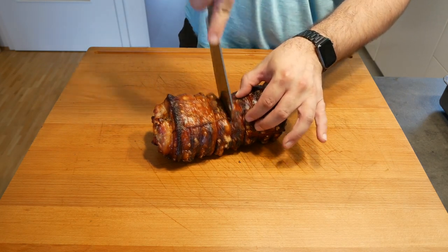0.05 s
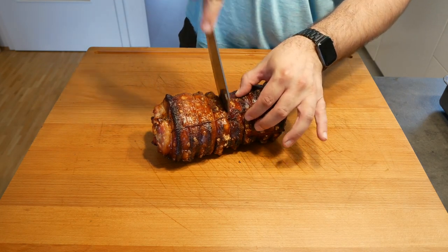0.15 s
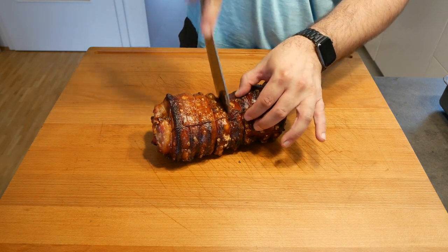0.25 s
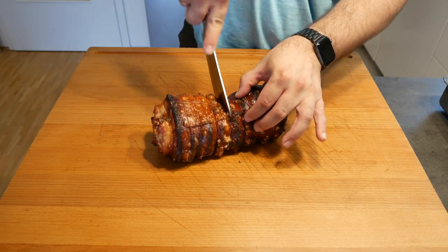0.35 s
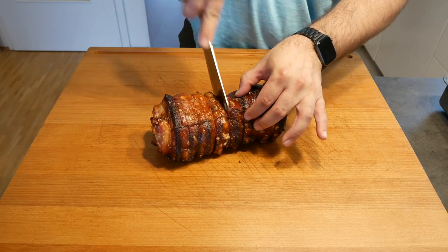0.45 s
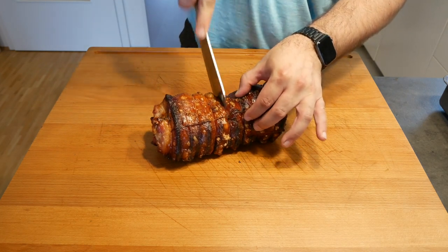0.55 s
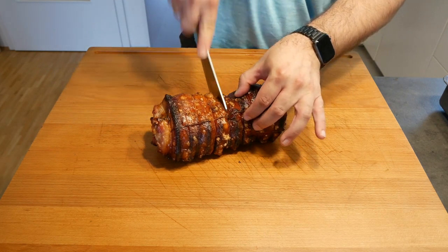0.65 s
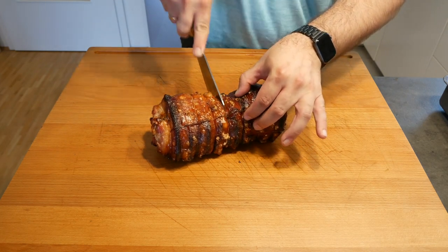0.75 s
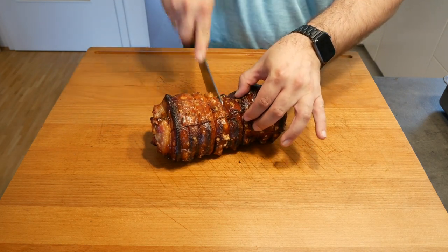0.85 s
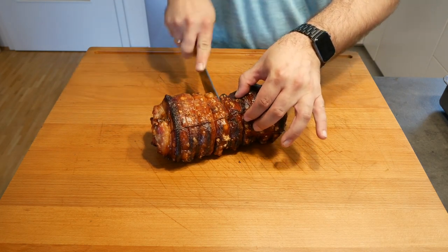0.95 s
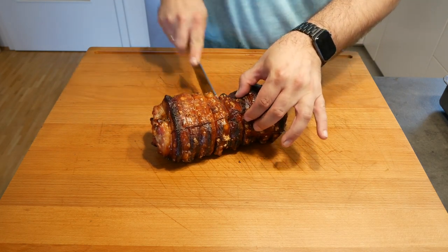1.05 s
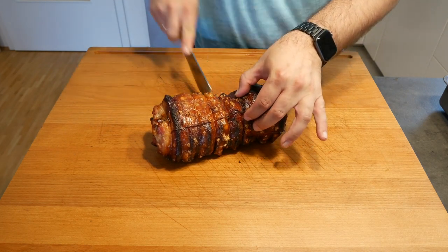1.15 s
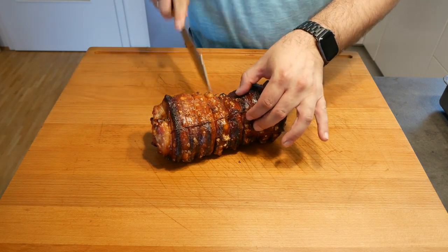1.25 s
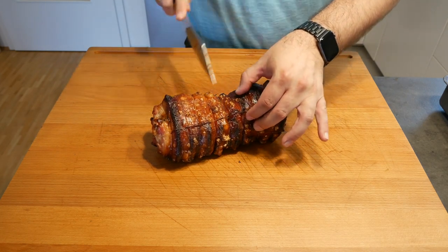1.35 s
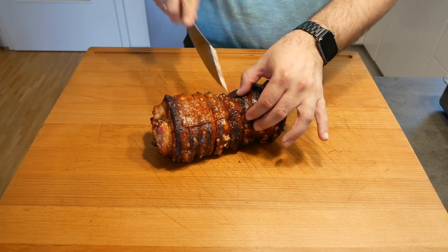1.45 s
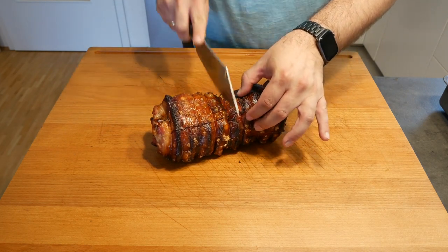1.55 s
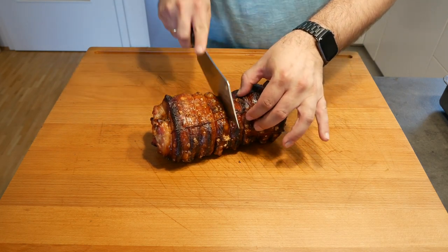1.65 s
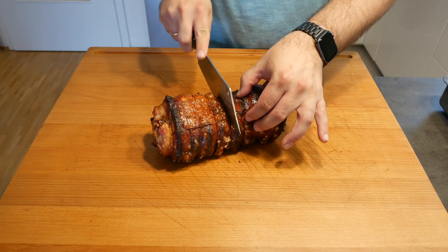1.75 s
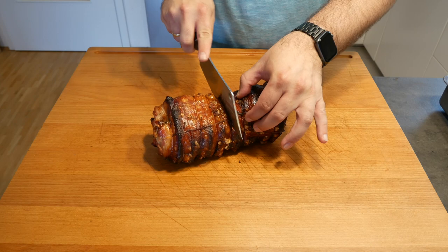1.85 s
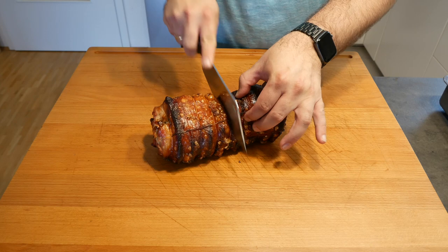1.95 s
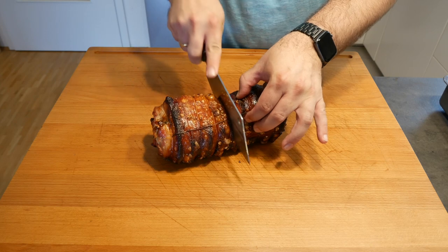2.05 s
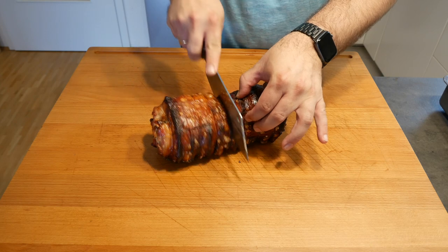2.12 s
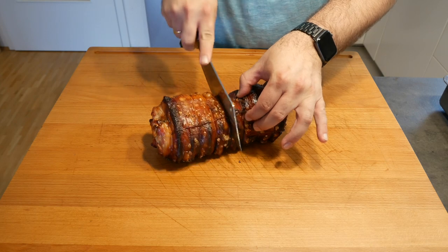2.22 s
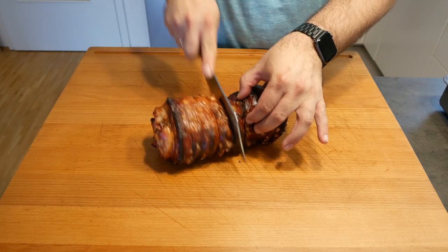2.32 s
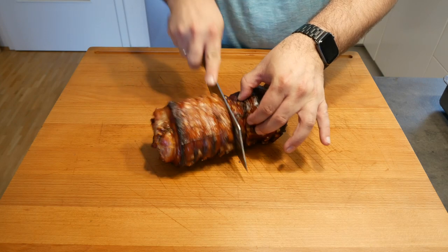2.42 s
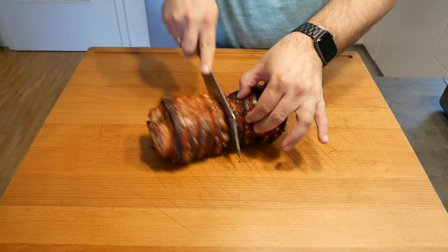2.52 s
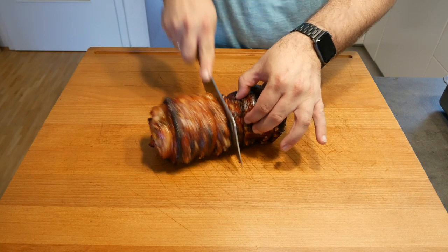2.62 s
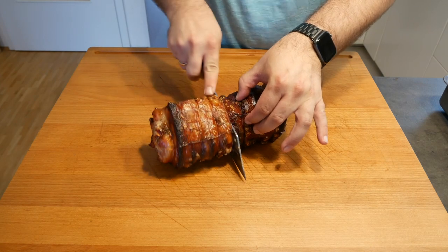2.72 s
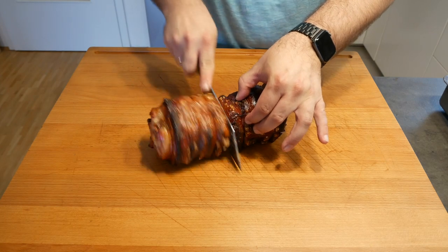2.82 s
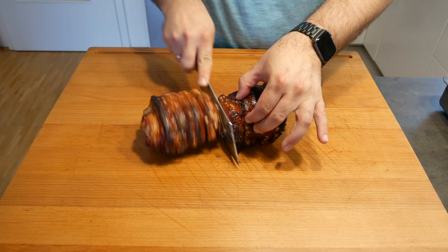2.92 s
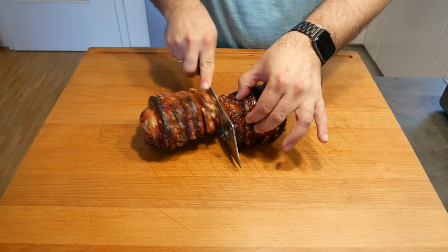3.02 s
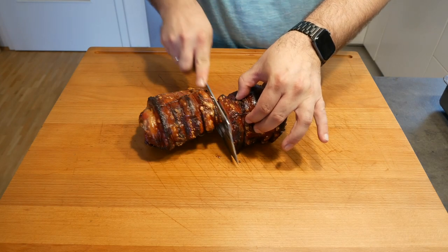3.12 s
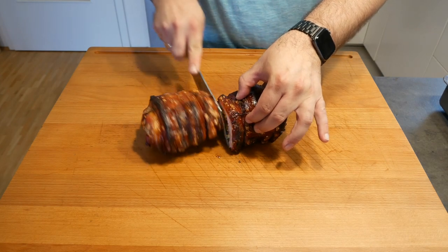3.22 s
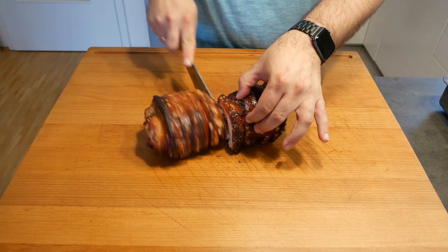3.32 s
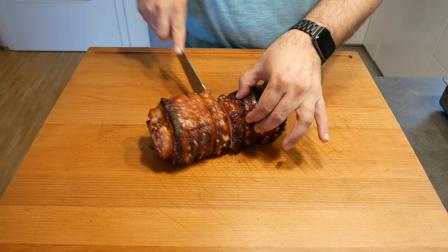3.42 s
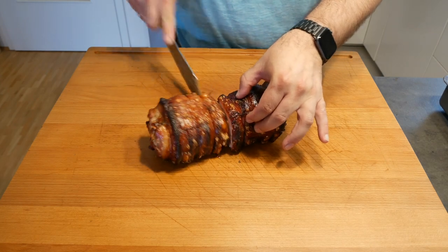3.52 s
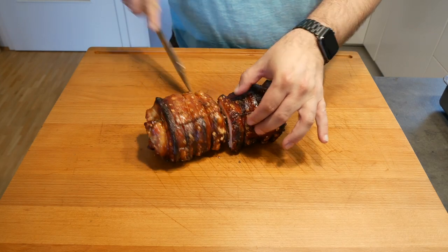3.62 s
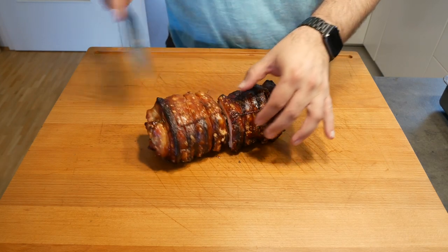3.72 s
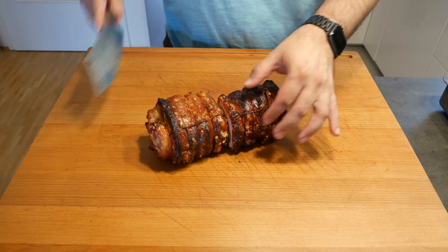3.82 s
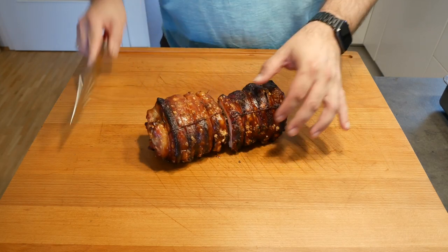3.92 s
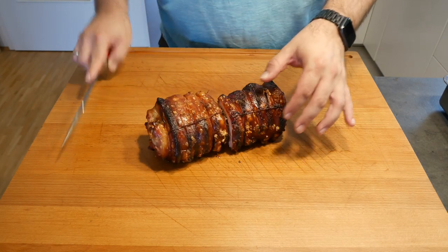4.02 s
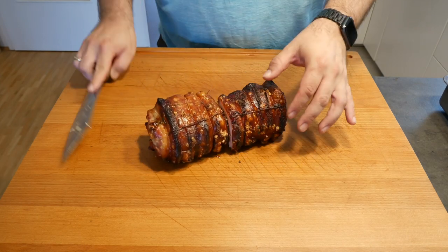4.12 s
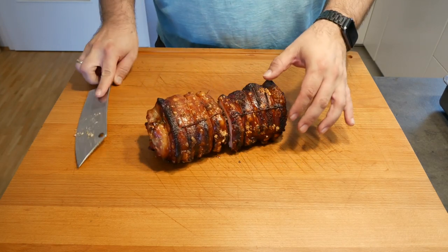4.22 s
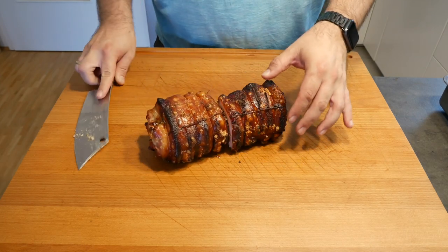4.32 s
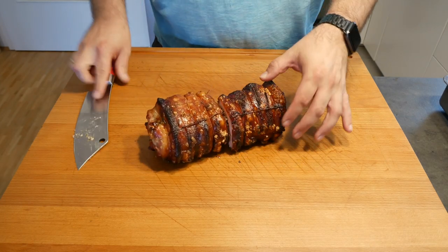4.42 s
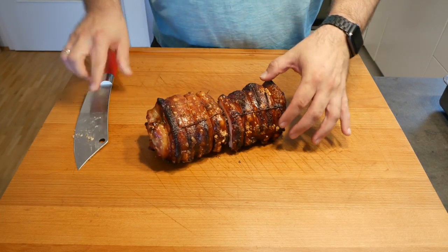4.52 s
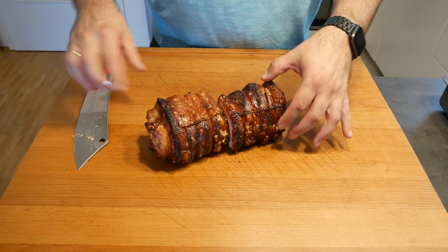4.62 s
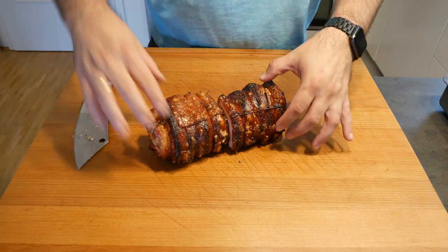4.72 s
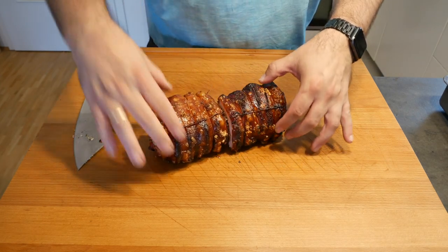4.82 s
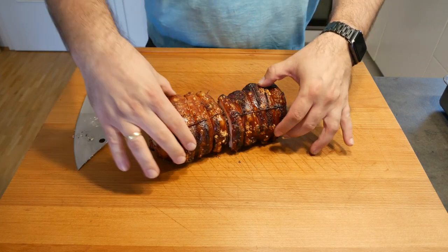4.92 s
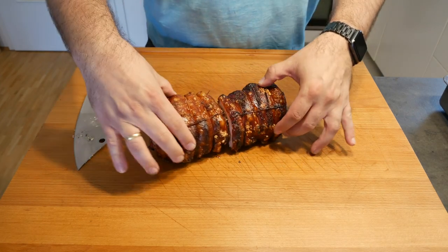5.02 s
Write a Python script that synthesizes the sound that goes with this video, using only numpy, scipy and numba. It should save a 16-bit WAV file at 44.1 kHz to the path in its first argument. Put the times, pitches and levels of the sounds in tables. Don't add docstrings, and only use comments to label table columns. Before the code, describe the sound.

A knife saws into a crackly roast on a wooden board, skin crunching and edge knocking, then the blade is laid down with a brief steely clack.

```python
import sys
import numpy as np
from scipy import signal
from scipy.fft import rfft, irfft, next_fast_len
from scipy.io import wavfile
from scipy.ndimage import uniform_filter1d
from numba import njit

SR = 44100
rng = np.random.default_rng(int(sys.argv[2]) if len(sys.argv) > 2 else 0)


def transcribe(signal):
    frames = np.atleast_2d(signal).T
    limited = np.clip(frames, -1, 1)
    pcm = np.round(limited * 32767).astype(np.int16)
    wavfile.write(sys.argv[1], SR, pcm)


def to_linear_factor(level_db):
    exponent = np.asarray(level_db, float) / 20
    return 10 ** exponent


N = 223066

# start_s, length_s, start_db, end_db, depth (-1 edge skims the crust, 1 blade deep in the meat)
STROKES = [(0, 0.17, -48.5, -63, -0.094), (.202, 0.088, -48.5, -41, -0.12), (.31, 0.17, -51, -66, -0.0013),
           (0.511, 0.053, -58, -50, -0.14), (0.629, 0.069, -45.5, -72, 1), (.76, 0.093, -67.5, -47, 0.31),
           (0.868, .14, -55, -48.5, 0.77), (1.02, 0.11, -47, -47.5, 0.13), (1.16, 0.055, -60, -78, -0.7),
           (1.58, 0.093, -66, -69, -1.4), (1.712, 0.11, -54, -61.5, 0.48), (1.82, 0.16, -54, -56.5, -0.18),
           (2.03, 0.14, -67, -52.5, -0.52), (2.36, .13, -47.5, -49, 0.38), (2.7, 0.13, -57.5, -47, 0.99),
           (2.862, 0.084, -54, -48.5, 1.0), (3.03, .185, -48.5, -48, .85), (3.225, .31, -47, -48.5, .4),
           (3.55, .09, -57, -70, -.1), (3.87, .05, -67, -70, 1), (4.04, 0.056, -68, -62, 0.43),
           (4.555, 0.16, -63, -59.5, 0.87), (4.744, 0.044, -53.5, -68, 0.94), (5.0, .06, -74, -61, 0.57)]
# start_s, length_s, start_db, end_db
DRAGS = [(0, 0.1, -53, -73), (.21, 0.084, -64, -42), (.31, 0.1, -45, -65), (1.66, 0.064, -67, -63),
         (1.82, 0.072, -51.5, -52.5), (2.38, 0.082, -50, -51), (2.7, 0.1, -30, -41),
         (2.84, 0.098, -51.5, -54), (3.04, 0.55, -50, -56), (3.54, 0.22, -63, -62), (4.74, 0.031, -60, -63)]
# pitch_hz, width_hz, level_db
BLADE_MODES = [(822, 52, -3.5), (1106, 730, 2), (1500, 53, 7.5), (1886, 290, 4), (2220, 120, -4),
               (3210, 70, -1.5), (3460, 25, -2), (4400, 78, -13), (5900, 110, -10.5)]
# time_s, pitch_factor
FREE_BLADE = [(0, 0.86), (.2, 0.71), (.3, 0.67), (.85, 1), (1.15, 1.03), (2.4, 0.79), (2.7, 1.15),
              (2.95, 0.9), (3.03, 0.97), (3.3, 1.08), (3.55, 1.08), (5.06, 0.89)]
# start_s, length_s, start_hz, end_hz, level_db
SINGING = [(3.022, .07, 820, 740, -46.5), (3.035, .055, 1100, 1160, -47), (3.26, .05, 1540, 1550, -51),
           (3.155, .025, 2060, 2050, -51), (3.03, .07, 2300, 2250, -55), (2.665, .06, 3400, 3350, -51),
           (2.75, .1, 3350, 3300, -56), (2.67, .09, 800, 800, -44), (2.67, .1, 1100, 1080, -46),
           (2.67, .08, 1550, 1500, -50), (.268, .028, 620, 600, -41), (.21, .03, 600, 600, -48),
           (.268, .02, 2400, 2500, -46), (.292, .008, 8500, 8800, -44), (.27, .015, 8000, 8000, -49),
           (.61, .008, 2500, 2600, -35), (.61, .012, 1900, 1800, -36), (.622, .012, 2200, 2300, -42),
           (.849, .012, 1150, 1150, -27), (3.1, .12, 740, 850, -52), (3.2, .14, 900, 1010, -53),
           (3.3, .09, 860, 900, -52), (3.39, .15, 940, 1110, -53), (3.2, .12, 1560, 1520, -54),
           (3.03, .17, 2020, 2050, -56), (3.05, .07, 1850, 1840, -57), (3.14, .16, 3350, 3850, -58),
           (3.2, .11, 2600, 2700, -58), (3.39, .06, 3080, 3100, -57), (3.5, .05, 3100, 3100, -56),
           (3.46, .07, 2250, 2100, -55), (3.33, .11, 4280, 4500, -60), (3.35, .06, 1500, 1540, -57),
           (1.0, .06, 3750, 3750, -57), (1.07, .05, 3550, 3550, -55), (1.09, .05, 2330, 2300, -55),
           (.96, .09, 2600, 2650, -59), (1.03, .09, 1500, 1560, -55), (1.04, .06, 4450, 4400, -59),
           (2.87, .09, 1050, 1150, -53)]
# start_s, length_s, pitch_hz, level_db
ZINGS = [(1.591, 0.091, 7660, -56), (1.585, 0.048, 8750, -63), (1.615, .04, 9100, -72),
         (2.575, 0.0088, 8050, -42), (2.599, 0.017, 8160, -33.5), (.601, 0.01, 2560, -38),
         (.602, 0.014, 1764, -39.5), (.615, 0.017, 2380, -48), (.616, 0.01, 3400, -44),
         (.858, 0.028, 1500, -45.5), (2.095, 0.085, 7090, -50.5), (2.116, .05, 7700, -67),
         (2.14, .04, 9400, -63), (2.097, 0.051, 11100, -59), (3.438, 0.087, 6600, -51),
         (3.474, 0.077, 6870, -53), (3.522, 0.045, 6270, -51.5), (3.526, 0.027, 7260, -53)]
# start_s, peak_db, low_crunch_db, # top_db (last two relative to the peak)
CRACKS = [(0.0732, -36, 0, 6), (.2034, -33, 0, -8), (.2691, -34, 7, -5), (0.2885, -34, -10, 4),
               (.297, -26, 7, -4), (0.543, -29, -8, 7), (0.5755, -31, -5, 2), (0.6015, -25, 16, -10),
               (0.841, -26.5, 9.5, -8), (1.593, -42, -12, 10), (1.6747, -32, -7, -7), (1.7142, -38, 2, -17),
               (1.8086, -26.5, -10, 8.5), (1.815, -35.5, -2, -24), (1.884, -39, 8, -9), (2.0496, -39.5, -3, -15),
               (2.1047, -35, -26, 12.5), (2.226, -29.5, 2.5, 2), (2.409, -29, -5, -7), (3.0155, -47, -10, 18),
               (3.0205, -47, 12, -12), (3.745, -45.5, 8, -10), (4.038, -53, -15, -18), (4.0837, -53, -6, -17),
               (4.16, -44, 1, -7), (4.7333, -27.5, -2, -14), (0.523, -46, -12, -6), (0.6976, -38, -6, 5),
               (.752, -44, -14, 5),
               (2.2612, -33, 0, 0), (2.2704, -25, -12, 6), (2.2724, -27, -8, 0), (2.2788, -33, 0, 2),
          (2.2842, -22, 4, -2), (2.2905, -16, -3, 6), (2.2925, -24, -3, 0), (2.3025, -21, -4, 2),
          (2.304, -20, -3, 0), (2.3062, -19, 0, 0), (2.3138, -19, 0, 6), (2.3187, -21, 3, 5),
          (2.3265, -23, -8, 6), (2.33, -16, -15, 4), (2.336, -30, 0, 0), (2.3418, -22, -2, 6),
          (2.3432, -18, -8, 6), (2.3502, -19, -7, 6), (2.3525, -26, -5, -3), (2.562, -27, -8, -2),
          (2.565, -27, -6, -2), (2.5697, -15, -8, 6), (2.5787, -14, -7, 5), (2.581, -24, 2, -5),
          (2.585, -27, 8, -6), (2.588, -30, 10, -6), (2.5972, -21, -10, 2), (2.5988, -13, -8, 0),
          (2.6027, -12, -6, 0), (2.6042, -14, -6, 2), (2.6056, -15, -8, 2), (2.6071, -14, -10, 2),
          (2.613, -21, 0, -2), (2.618, -23, -3, 3), (2.6244, -18, -4, -5), (2.63, -26, 4, -4),
          (2.6368, -14, -4, -10), (2.641, -18, 2, 0), (2.6425, -22, 0, 5), (2.6445, -21, 4, 0),
          (2.6095, -20, -6, 4), (2.6155, -23, -4, 4), (2.621, -25, -4, 4), (2.633, -26, -2, 3),
          (2.648, -17, 4, 0), (2.6515, -14, 0, -6)]
# start_s, length_s, start_db, end_db, low_crunch_db (relative)
CRUNCHES = [
    (0.235, 0.064, -60, -33.5, -9),
    (0.577, 0.04, -44, -44, -8),
    (2.23, 0.023, -54, -57, 5),
    (2.259, 0.016, -43, -43, -3),
    (2.286, 0.029, -33.5, -34.5, -0.5),
    (2.324, 0.03, -32, -35, 1),
    (2.566, 0.022, -35, -45.5, 3),
    (2.604, 0.03, -24, -53, -8.5),
    (2.63, 0.023, -32, -33, 0),
]
# start_s, peak_db, contact_ms, higher_modes_db, pitch_factor
KNOCKS = [(0.296, -11, 0.55, -6, 0.97), (0.2992, -24.5, 0.97, -16, 1.14), (0.543, -33.5, 0.87, -14, 0.89),
          (.5748, -27.5, 0.63, -10, 0.89), (0.6, -10.5, 0.76, -5.5, 0.95), (0.6031, -16.5, 0.45, 2, 1.0),
          (0.6135, -24.5, 0.9, 11.5, 1.05), (0.8387, -5.5, 0.82, 0, 1.04), (0.8414, -17, 0.74, 5.5, 1.02),
          (2.2261, -27.5, 1, -4, 1.04), (2.315, -36.5, 0.21, 8, 1.15), (2.318, -48, .3, 3, 0.76),
          (2.3427, -26.5, 0.18, 11, 1.15), (2.5435, -23, 0.77, 1.5, 1.02), (2.6495, -14, .6, 1, 1.0),
          (2.6516, -5.5, .6, 4, 1.0), (2.6543, -15, .5, 6, 1.0), (4.2879, -10.5, 0.24, 6.5, 0.96),
          (4.3131, -28, 0.34, 6, 0.56), (4.3165, -30, 0.48, -3, 0.82)]
# pitch_hz, level_db, t60_s
BOARD_LOW = [(359.2, 1.5, 0.056), (345.1, -17, 0.39), (393.3, -18.5, 0.42)]
# pitch_hz, level_db, t60_s
BOARD_MID = [(599, -2, 0.034), (757, 5.5, 0.012), (861, -10.5, 0.04)]
# pitch_hz, level_db, t60_s
BOARD_UP = [(1085, -6.5, 0.044), (1200, -16, 0.059)]
# start_s, ring_db, slap_db
LANDINGS = [
    (4.2885, -10.5, -11),
    (4.2908, -3, -9.5),
    (4.302, -23, -36),
    (4.3170, -30, -33),
]
KNIFE_HZ = [590, 790, 1405, 2030, 2800, 3400, 3560, 4835, 5850, 6265, 7220, 7800, 8500, 9290, 10500]
# level_db, t60_s
KNIFE_RING = [(-30, 0.19), (1, 0.0074), (7, 0.027), (4, 0.032), (-14, 0.05), (-6, 0.023), (-13, 0.026),
              (-32, 0.046), (-4.5, 0.021), (-27, 0.072), (-10, 0.046), (-11, 0.029), (-14, 0.069),
              (-34, .1), (-29, 0.087)]
# pitch_hz, level_db, t60_s
LINGERING_STEEL = [(592, -30, .3), (624, -32, .45), (1340, -34, .6), (1404, -33, .45), (1997, -42, .4),
                   (2051, -40, .25), (2799, -43, .4), (3335, -41, .35), (3535, -41, .35), (4838, -38, .4),
                   (6262, -31, .26), (7222, -40, .3), (12920, -47, .15), (15530, -50, .12)]
# pitch_hz, level_db
SHIVER_MODES = [(625, 5.5), (910, 4), (1340, 3), (1510, 1), (1650, -3), (1815, 0), (2055, -9), (2400, -7),
                (2740, 0), (3150, -3.5), (3330, -2), (3750, -3), (4480, -4), (4790, -4), (5400, -5),
                (6300, -2), (6660, -4), (9900, 0), (10900, 1), (11300, 1), (11700, 1), (12300, 1),
                (13000, 2), (14200, 0)]
# start_s, level_db
THUDS = [
    (0.298, -22.5),
    (0.6, -20),
    (0.841, -27.5),
    (2.3, -30),
    (2.556, -24.5),
    (2.654, -25),
    (4.288, -24),
    (4.36, -19.5),
]
# pitch_hz, level_db, t60_s
WORKTOP_MODES = [(59, -38, 0.37), (99.8, -12, 0.18), (157.6, -10, 0.14)]
# peak_s, level_db, rise_s, fall_db_per_s
PUSHES = [(0, -53, 0.026, 146), (.32, -37, 0.047, 80), (.62, -39, 0.032, 116), (.84, -44.5, 0.077, 95),
          (1.11, -59, .08, 124), (1.9, -63, 0.7, 116), (2.09, -64, .08, 150), (2.3, -52, 0.11, 42),
          (2.62, -48, 0.15, 130), (2.871, -49.5, 0.039, 24), (3.77, -75, 0.092, 42), (4.19, -55, 0.055, 60),
          (4.4, -42.5, 0.11, 73), (4.62, -58, 0.09, 13)]
# band_hz, t60_s
ROOM_DECAY = [(150, 0.57), (400, 0.56), (1000, 0.48), (2500, 0.8), (6000, 0.56), (12000, 0.2)]
# frequency_hz, density_db (per Hz)
AIR = [(18, -73), (30, -43), (98, -3), (223, -1.5), (283, -5.5), (378, -6), (562, -4.5), (676, -6.5),
       (881, -10.5), (1240, -5.5), (1940, -17.5), (3380, -14), (3860, -17.5), (13700, -29), (16500, -32)]
# pitch_hz, level_db
FRIDGE_TONES = [(290.7, -67.5), (872, -67.5), (1200, -75.5)]


def level(x, db):
    return x * to_linear_factor(db) / np.sqrt(np.mean(x ** 2))


def band(x, lo_hz, hi_hz):
    sos = signal.butter(2, [lo_hz, min(hi_hz, .45 * SR)], "band", fs=SR, output="sos")
    return signal.sosfilt(sos, x)


def colour(x, hz, db):
    n = next_fast_len(len(x))
    f = np.maximum(np.fft.rfftfreq(n, 1 / SR), 1)
    gain = to_linear_factor(np.interp(np.log(f), np.log(hz), db))
    return irfft(rfft(x, n) * gain, n)[:len(x)]


def walk(rate):
    hold = int(SR / rate)
    steps = np.repeat(rng.standard_normal(N // hold + 1), hold)
    return 0.94 * uniform_filter1d(steps, hold)[:N]


def ring(modes, pitch):
    hz, db, t60 = np.transpose(modes)
    t = np.arange(SR // 2)[:, None] / SR
    sines = np.exp(t * (2j * np.pi * hz * pitch - np.log(1000) / t60)).imag
    fade_out = np.minimum(10 - 20 * t[:, 0], 1)
    return sines @ to_linear_factor(db) * fade_out


def add(out, start_s, x):
    i = int(start_s * SR)
    out[i:i + len(x)] += x[:N - i]


def spans(rows, attack_s, release_s):
    t = np.arange(0, N + 32, 32) / SR
    curves = []
    for s, length, a, b in np.array(rows)[:, :4]:
        times = [s - attack_s, s, s + length, s + length + release_s]
        curves.append(np.interp(t, times, [a - 20, a, b, b - 20], -200, -200))
    return np.repeat(to_linear_factor(np.array(curves)), 32, axis=1)[:, :N]


@njit
def svf(x, hz, width):
    y, b, l = np.empty(len(x)), 0., 0.
    for i in range(len(x)):
        g, k = np.tan(np.pi * hz[i] / SR), width / hz[i]
        v = (b + g * (x[i] - l)) / (1 + g * (g + k))
        b, l, y[i] = 2 * v - b, l + 2 * g * v, k * v
    return y


def rubbing():
    t = np.arange(N) / SR
    strokes = spans(STROKES, 0.013, 0.028)
    depth = np.array(STROKES)[:, 4]
    fizz_gain = to_linear_factor(-3.5 - 10 * depth) @ strokes
    body_gain = to_linear_factor(-1.6 + 9.5 * depth) @ strokes
    drag_gain = spans(DRAGS, 0.014, 0.03).sum(axis=0)
    slips = rng.standard_normal(N) * to_linear_factor(1.2 * walk(400))

    free = np.interp(t, *np.transpose(FREE_BLADE))
    blade = to_linear_factor(-8) * slips
    for hz, width_hz, db in BLADE_MODES:
        flicker = to_linear_factor(db + 13.0 + 3 * walk(24.96))
        moving_hz = hz * free ** ((800 / hz) ** 0.49)
        blade = blade + flicker * svf(slips, moving_hz, 1. * width_hz)

    streaks = level(flakes(slips, 1590, 6990, .07, 83.0, count=6), -7.0)
    grit = level(band(slips, 6000, 13500), -4)
    grit = grit + level(flakes(slips, 6500, 15000, .025, 70., count=8), -4.5)
    steel = strokes.sum(axis=0) * (level(band(blade, 2780, 10950), -2.4) + streaks)
    meat = body_gain * level(band(blade, 606, 1146), -1.46)
    board = drag_gain * level(band(slips, 329, 396.4), 0)
    return to_linear_factor(0.5) * (steel + fizz_gain * grit + meat + board)


def flakes(slips, lo_hz, hi_hz, hold_s, sharp, count):
    hold, out = int(hold_s * SR), 0
    creep = 1 + .008 * (np.arange(N + hold) % hold) / hold
    width_hz = np.sqrt(lo_hz * hi_hz) / sharp
    for shift in rng.integers(0, hold, count):
        pitches = lo_hz * (hi_hz / lo_hz) ** rng.random(N // hold + 2)
        hz = np.repeat(pitches, hold)[:N + hold] * creep
        out = out + svf(slips, hz[shift:shift + N], width_hz)
    return out


def singing():
    out = np.zeros(N)
    noises = rng.standard_normal((len(SINGING), 12000))
    for (s, length, from_hz, to_hz, db), noise in zip(SINGING, noises):
        part = np.arange(len(noise)) / SR / length
        hz = from_hz + (to_hz - from_hz) * np.minimum(part, 1)
        tone = level(svf(svf(noise, hz, 120.), hz, 120.), db)
        swell = np.clip(np.minimum(5 * part, 4 * (1.3 - part)), 0, 1)
        add(out, s - .01, tone * swell)
    return out


def zings():
    out = np.zeros(N)
    noises = rng.standard_normal((len(ZINGS), 8000))
    for (s, length, hz, db), noise in zip(ZINGS, noises):
        t = np.arange(len(noise)) / SR
        envelope = np.minimum(t / 0.002, 1) * np.exp(-(t / length) ** 3)
        add(out, s, level(band(noise, hz - 60, hz + 60), db) * envelope)
    return out


def cracks():
    out, t = np.zeros(N), np.arange(1000) / SR
    s, db, low_db, top_db = np.transpose(CRACKS)[:, :, None]
    t60 = np.maximum(0.01 + .001 * np.maximum(low_db, 0), .002)
    snap = 9.0 * (t == 0)
    spray = rng.laplace(size=(len(s), len(t))) * 1000. ** (-t / t60)
    burst = spray + snap
    parts = (band(burst, 2150, 7030),
             band(band(burst - snap, 335, 1450), 350, 1960),
             band(burst, 10160, 15100))
    mid, low, top = (p / np.abs(p).max(axis=1, keepdims=True) for p in parts)
    breaks = to_linear_factor(db - 1.0) * (mid + to_linear_factor(low_db - 5.0) * low + to_linear_factor(top_db - 5.0) * top)
    for start_s, crack in zip(s[:, 0], breaks):
        add(out, start_s, crack)
    return out


def crumble():
    press = spans(CRUNCHES, 0.015, 0.0073)
    chance = rng.random((N, 2)).T
    starts = (chance[0] < 6000 / SR) * to_linear_factor(-2.5 * np.log(chance[1] + .02))
    decay = signal.lfilter([1], [1, -np.exp(-1 / (0.0015 * SR))], starts)
    grains = rng.standard_normal(N) * decay * to_linear_factor(7.5 * walk(160))
    low_gain = to_linear_factor(np.array(CRUNCHES)[:, 4]) @ press
    crisp = press.sum(axis=0) * level(band(grains, 2500, 12000), 0)
    return crisp + low_gain * level(band(grains, 830, 1500), 0)


def knocks():
    out = np.zeros(N)
    up_db_per_ms = 6
    for s, db, ms, mid_db, pitch in KNOCKS:
        push = np.hanning(int(max(ms, .1) * SR / 1000) + 3)
        wood = ring(BOARD_LOW, pitch) + to_linear_factor(mid_db) * ring(BOARD_MID, pitch)
        wood = wood + to_linear_factor(mid_db - 5.2 + up_db_per_ms * ms) * ring(BOARD_UP, pitch)
        add(out, s, to_linear_factor(db - 4.5) * np.convolve(wood, push / push.sum()))
    return band(band(out, 270, 2500), 180, 2500)


def knife_down():
    out, t = np.zeros(N), np.arange(SR // 2) / SR
    steel = band(ring(np.column_stack([KNIFE_HZ, KNIFE_RING]), 1), 400, 16000)
    for s, db, slap_db in LANDINGS:
        slap = band(rng.standard_normal(len(t)), 1050, 8100) * 1000. ** (-t / 0.015)
        add(out, s, to_linear_factor(db - 10.5) * steel + to_linear_factor(slap_db) * slap)

    chatter = rng.standard_normal(len(t)) * to_linear_factor(2.2 * walk(77)[:len(t)]) * 1000. ** (-t / .4)
    woken_modes = [(hz, db, .06) for hz, db in SHIVER_MODES] + [(hz, -4, .045) for hz in KNIFE_HZ]
    woken = signal.fftconvolve(chatter, ring(woken_modes, 1))[:len(t)]
    shiver = colour(to_linear_factor(-1) * chatter + to_linear_factor(-28) * woken,
                    [200, 600, 1100, 1600, 3200, 7000, 12000, 15000],
                    [2, 15.0, 9, 15, 9.5, 10, -10, -12])
    main_s = LANDINGS[1][0]
    add(out, main_s, ring(LINGERING_STEEL, 1))
    add(out, main_s, to_linear_factor(-43) * shiver[:4 * len(t) // 5])
    return out


def thuds():
    out = np.zeros(N)
    rise = 1 - np.exp(-np.arange(SR // 2) / SR / 0.007)
    for s, db in THUDS:
        add(out, s, to_linear_factor(db) * rise * ring(WORKTOP_MODES, 0.99))
    return out


def room(x):
    t = np.arange(SR) / SR
    tail = np.zeros(SR)
    for hz, t60 in ROOM_DECAY:
        noise = level(band(rng.standard_normal(SR), hz / 1.55, hz * 1.58), 0)
        tail += noise * np.sqrt(hz) * 1000. ** (-t / t60)
    tail = tail * (1 - np.exp(-(t / 0.0021) ** 2))
    return signal.fftconvolve(x, tail / np.sqrt(np.sum(tail ** 2)))[:N]


def kitchen():
    t = np.arange(N) / SR
    air = level(colour(rng.standard_normal(N), *np.transpose(AIR)), -55.5) * to_linear_factor(0.4 * walk(3.94))
    hum = np.zeros(N)
    for hz, db in FRIDGE_TONES:
        hum += to_linear_factor(db + 3 + 4 * walk(8)) * np.sin(2 * np.pi * hz * t + 1.5 * walk(6))
    shake = to_linear_factor(-81)
    for s, db, rise_s, fall_db_per_s in PUSHES:
        drop_db = np.where(t < s, 20 * (s - t) / rise_s, fall_db_per_s * (t - s))
        shake = shake + to_linear_factor(db - drop_db)
    rumble = level(band(rng.standard_normal(N), 32.6, 67.0), 0) * shake
    return air + hum + rumble


def scene():
    body = rubbing() + singing() + zings()
    crust = cracks() + crumble()
    body = body + knocks() + thuds() + knife_down()
    mid = body + crust + to_linear_factor(-11.5) * room(body + to_linear_factor(-1) * crust) + kitchen()
    phase = np.exp(2j * np.pi * rng.random(257))
    scatter = colour(irfft(phase), [60, 300, 1000, 8000, 14000], [-11, -11, -6.5, 0.5, 7.5])
    knee = .3
    side = to_linear_factor(-26.5) * signal.fftconvolve(knee * np.tanh(mid / knee), scatter)[:N]
    return np.array([mid + side, mid - side])


def band_limit(x):
    return signal.sosfilt(signal.butter(12, 16990, fs=SR, output="sos"), x)


def record(dry):
    low_pass = signal.ellip(8, .3, 50, 15550, fs=SR, output="sos")
    mix = np.clip(signal.sosfilt(low_pass, dry), -1, 1)
    return band_limit(mix)


dry = scene()
out = record(dry)
transcribe(out)
```